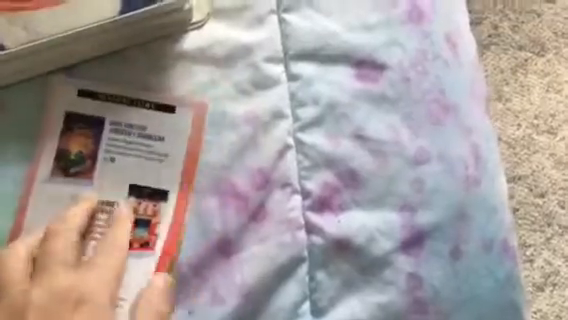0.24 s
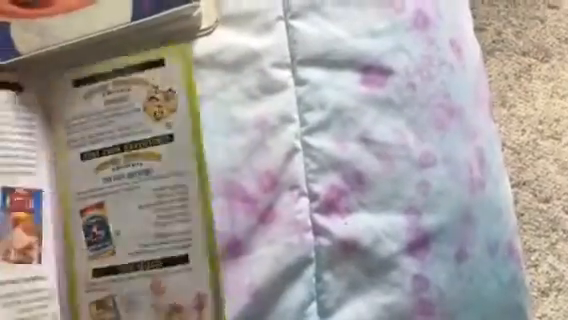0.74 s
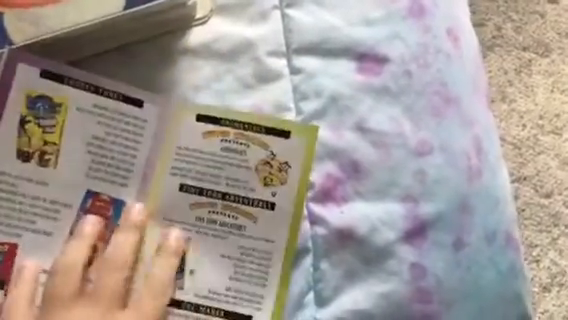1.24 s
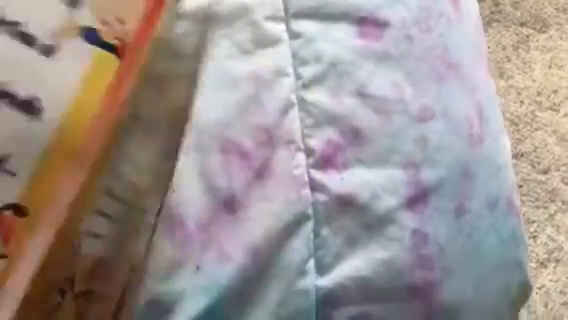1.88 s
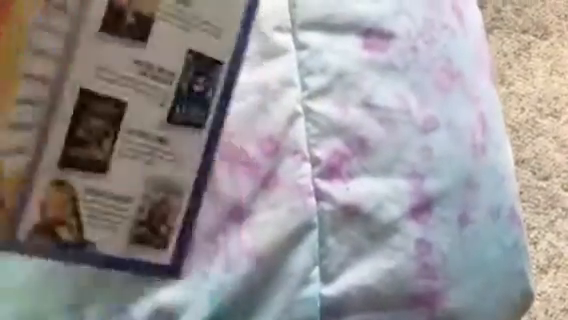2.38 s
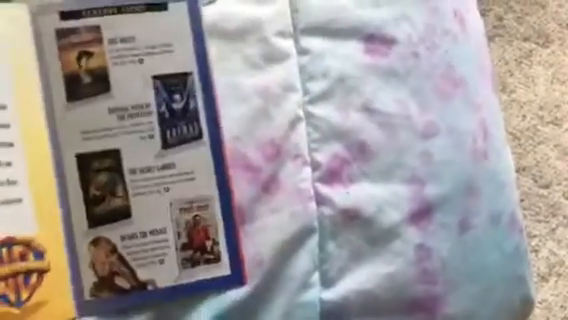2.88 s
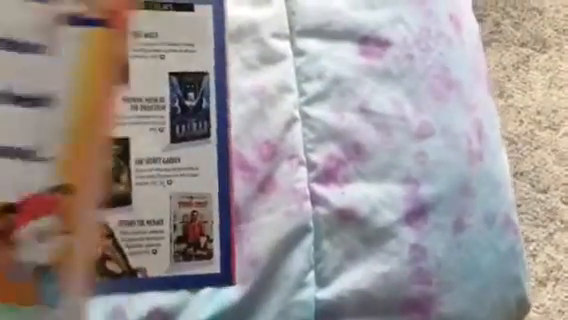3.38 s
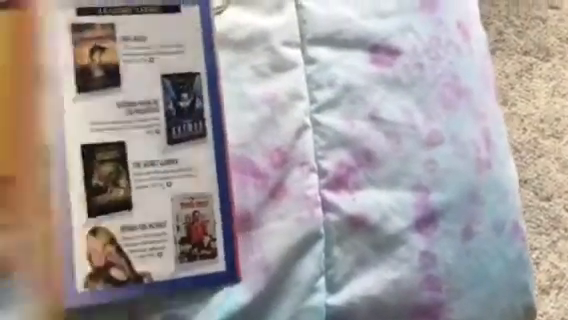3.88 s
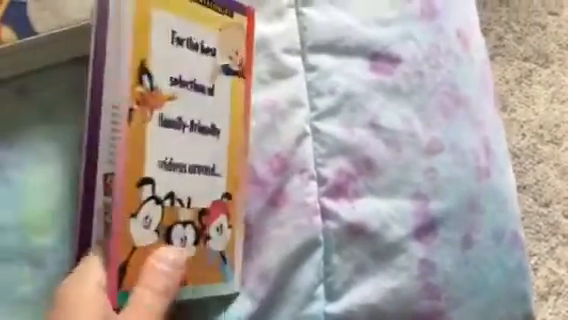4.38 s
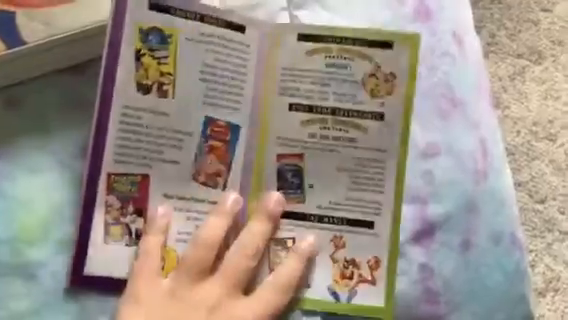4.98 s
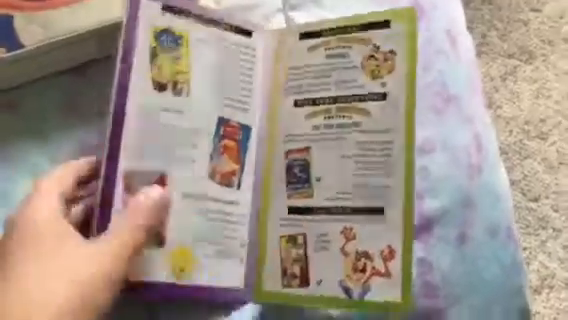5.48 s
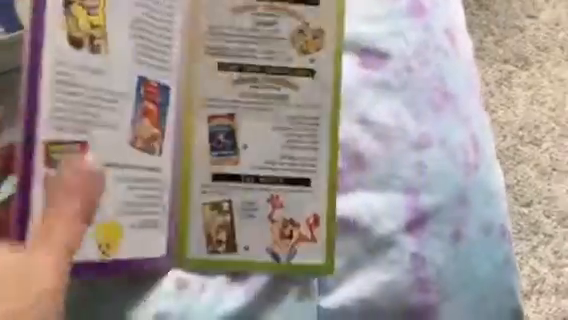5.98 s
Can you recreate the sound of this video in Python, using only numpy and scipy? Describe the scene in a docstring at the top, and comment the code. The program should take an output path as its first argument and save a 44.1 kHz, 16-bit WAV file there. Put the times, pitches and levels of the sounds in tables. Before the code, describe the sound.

A folded glossy leaflet is flipped and handled close up, with papery rustles, sharp crease snaps, one rattling slap and soft quilt thuds.

```python
"""A small quiet room: a folded glossy leaflet is worked in the hands above a quilt, close to a phone.
Creases snap as dispersed clicks with noise flutter; panels pop and flex as bursts of resonant noise.
One panel slaps down with a ringing rattle and a crack; paper slides over paper and skin as hiss and rub.
Edges scuff, the quilt thuds and shifts, and a faint whine comes and goes twice.
Near reflections and a short tail surround the handling, over a low rumble of air."""
import sys
import numpy as np
from scipy import signal
from scipy.fft import rfft, irfft
from scipy.io import wavfile
from scipy.ndimage import uniform_filter1d

SR = 44100
rng = np.random.default_rng(int(sys.argv[2]) if len(sys.argv) > 2 else 0)


def waveform_to_disk(signal):
    """Save audio, clipped to [-1, 1], as 16-bit WAV at the path in sys.argv[1]."""
    frames = np.transpose(np.atleast_2d(signal))
    scaled = np.clip(frames, -1, 1) * 32767
    samples = np.round(scaled).astype(np.int16)
    wavfile.write(sys.argv[1], SR, samples)


N = 275184
TIME = np.arange(N) / SR
SIZE = 8192  # samples in a short event and in a filter
LEAD_S = .012  # room for the onset ahead of a buckle's jump
LANDS_S = 1.0216  # the slapping panel lands flat


def undb(db):
    """Decibels to gain."""
    return 10 ** (np.asarray(db) / 20)


def unit(x):
    """Scale to rms 1."""
    return x / np.sqrt(np.mean(x ** 2))


def colour(x, points, scale=1):
    """Minimum-phase filter whose gain follows (frequency, dB) points, frequencies times scale."""
    f, db = np.transpose(points)
    log_hz = np.log(np.fft.rfftfreq(SIZE, 1 / SR) + 1)
    log_gain = np.interp(log_hz, np.log(f * scale), db) * np.log(10) / 20
    # folding the cepstrum onto positive time makes the filter causal
    cepstrum = irfft(log_gain)
    cepstrum[1:SIZE // 2] *= 2
    cepstrum[SIZE // 2 + 1:] = 0
    impulse_response = irfft(np.exp(rfft(cepstrum)))
    return signal.oaconvolve(x, impulse_response)[:len(x)]


def resonate(x, hz, width_hz):
    """One resonance, gain 1 at its centre."""
    return signal.lfilter(*signal.iirpeak(hz, hz / width_hz, fs=SR), x)


def grains(size, spread_db):
    """Dense tiny slips: noise whose strength jumps every 16 samples; rms 1."""
    strength = np.repeat(rng.standard_normal(size // 16 + 1), 16)[:size]
    return unit(rng.standard_normal(size) * undb(spread_db * strength))


def walk(rate_hz):
    """Smoothed random levels, rate_hz of them a second, spread near 1."""
    k = int(SR / rate_hz)
    return uniform_filter1d(np.repeat(rng.standard_normal(N // k + 1), k), k)[:N]


def add(out, s, x):
    """Mix x in from time s, clipped to the ends of out."""
    i = int(s * SR)
    x, i = x[max(-i, 0):], max(i, 0)
    out[i:i + len(x)] += x[:max(N - i, 0)]


def swell(s, half_s):
    """Start and envelope of a rise and fall peaking at s, about 7 dB down half_s to each side."""
    t = (np.arange(SIZE) - SIZE // 2) / SR
    return s + t[0], signal.windows.tukey(SIZE) / np.cosh(1.44 * t / half_s)


def strokes(rows):
    """Gain of overlapping slides (start s, length s, peak dB): the hand speeds up, then slows to a stop."""
    fastest_share, speed_law = 0.36, 0.58  # fraction of the slide; gain = speed ** speed_law
    power = np.zeros(N)
    for start_s, length_s, db in rows:
        share = np.arange(0, length_s, 1 / SR) / length_s
        phase = np.interp(share, [0, fastest_share, 1], [0, np.pi / 2, np.pi])
        speed = np.abs(np.sin(phase))
        add(power, start_s, (undb(db) * speed ** speed_law) ** 2)
    return np.sqrt(power)


def air():
    """Still air of the house: steady noise weighted to a low rumble."""
    # Each row: frequency in Hz, level in dB.
    air_spectrum = [(15, 1), (25, -3), (59, 7), (141, -8.5), (185, 3), (236, -16), (309, -7.5), (818, -16),
                    (1070, -18), (4870, -32), (6380, -33.5), (14800, -36.5), (16000, -51.5)]
    return unit(colour(rng.standard_normal(N), air_spectrum)) * undb(-65.5)


def whine():
    """A faint thin tone: noise through two narrow resonances in series."""
    # Each row: start in seconds, length in seconds.
    whine_spans = [(3.71, 0.37), (5.726, 0.35)]
    whine_db = -75.5
    tone = resonate(resonate(rng.standard_normal(N), 1334, 110), 1300, 110)
    return unit(tone) * strokes([(*span, whine_db) for span in whine_spans])


def quilt(paper):
    """Cloth shifts beneath the hands, the more the harder the paper is worked."""
    # Each row: frequency in Hz, level in dB.
    cloth_spectrum = [(24, -36), (40, -4.5), (70, -0.5), (108, -5.5), (183, -3), (214, -9), (302, -7.5),
                      (476, -20.5), (642, -23.5), (1200, -24), (1560, -50.5), (2640, -120)]
    cloth_db, effort_law, smoothing_s = -65, .3, 0.12
    effort = uniform_filter1d(np.abs(paper), int(smoothing_s * SR))
    shift = unit(np.abs(effort) ** effort_law)
    rustle = unit(colour(grains(N, 2.4), cloth_spectrum))
    return rustle * shift * undb(cloth_db + 2.6 * walk(25))


def thuds():
    """A hand or panel lands; the padded quilt answers with a damped low swing."""
    # Each row: start in seconds, swing amplitude before decay in dB, pitch in Hz.
    landings = [(.653, -45.5, 133), (1.026, -35.5, 156), (1.343, -38, 156), (1.43, -41, 181),
                (2.021, -43, 64.3), (2.150, -43.5, 197), (2.276, -43.5, 171), (2.403, -38.5, 125),
                (2.711, -34.5, 131.6), (5.547, -46, 130), (6.040, -50, 112)]
    decay_cycles = 1
    out, t = np.zeros(N), np.arange(SIZE) / SR
    for s, db, hz in landings:
        swing = np.sin(2 * np.pi * hz * t) * np.exp(-t * hz / decay_cycles)
        add(out, s, undb(db) * swing)
    return out


def friction():
    """Gains of glossy hiss and dry rub: slides over a light, restless grip."""
    # Each row: start in seconds, length in seconds, peak hiss gain in dB, rub in dB re the hiss.
    slides = [(0.069, 0.12, -67.5, -3), (0.216, .14, -74.5, 0), (0.334, .12, -65.5, 1.5),
              (0.433, .30, -62, -7), (0.686, 0.24, -66, 4), (.87, 0.21, -71.5, 0.5),
              (1.008, .16, -60.5, 0.5), (1.168, 0.18, -63.5, 9.5), (1.288, .235, -58.5, -0.5),
              (1.642, 0.071, -55.5, 0), (1.7, 0.084, -59.5, -4), (1.754, .13, -65.5, -1),
              (1.848, 0.1, -58, 5.5), (2.24, 0.1057, -78, -7), (2.374, .14, -69.5, 0),
              (2.493, 0.12, -71, -1), (2.544, .125, -62.5, -0.5), (2.64, .31, -71.5, -5.5),
              (3.124, .10, -65, -0.5), (3.229, 0.082, -72, -2), (3.289, .105, -63.5, -6.5),
              (3.457, .12, -67.5, -9.5), (3.61, 0.11, -73, -1), (3.946, 0.26, -73, 1.5),
              (4.193, .16, -73, 5), (4.539, .18, -71, -1), (4.69, .21, -68.5, 1.5), (4.946, .14, -70, 3.5),
              (5.315, 0.046, -71, -11), (5.526, .065, -58.5, 0), (5.58, .21, -74, -2), (5.79, 0.19, -84, 0),
              (6.01, .12, -74.5, 3), (6.144, .08, -65.5, -2)]
    grip_hiss_db, grip_rub_db, grip_wander_db = -78, -78, 1.5
    grip = undb(grip_wander_db * walk(4.2))
    hiss = strokes([(s, length_s, db) for s, length_s, db, rub_db in slides])
    rub = strokes([(s, length_s, db + rub_db) for s, length_s, db, rub_db in slides])
    return np.hypot(hiss, undb(grip_hiss_db) * grip), np.hypot(rub, undb(grip_rub_db) * grip)


def scuffs():
    """A catching edge gives a brief gritty burst; random stray ticks scale with the rub gain."""
    # Each row: time of the peak in seconds, rms level there in dB.
    catches = [(.0345, -53), (.044, -52.5), (.658, -48.5), (0.689, -57), (.912, -50), (1.012, -50),
               (1.659, -46.5), (1.681, -46), (1.735, -44.5), (1.82, -51), (2.251, -59.5), (2.432, -61.5),
               (2.723, -54.5), (2.9, -55.5), (3.661, -55.5), (4.411, -54.5), (4.585, -58), (4.862, -59.5),
               (4.965, -62.5), (5.614, -51.5), (5.666, -55), (5.737, -56), (5.775, -56.5)]
    half_s, ticks_per_s = 0.0015, 18
    # Each row: frequency in Hz, level in dB.
    grit = [(300, -14.0), (1200, 5.0), (2200, -4.0), (5000, -6.5), (9000, -6.0), (16000, -14.0)]
    out = np.zeros(N)
    for s, db in catches:
        start_s, envelope = swell(s, half_s)
        add(out, start_s, undb(db) * envelope * unit(colour(grains(SIZE, 3.1), grit)))
    ticks = (rng.random(N) < ticks_per_s / SR) * (2 * rng.random(N) - 1)
    _, rub_gain = friction()
    return out + undb(19.0) * colour(ticks * rub_gain, grit)


def glance(x):
    """The moving panel adds a reflection of wandering delay, so the hiss shifts in colour."""
    lag_samples = SR * 0.00033 * np.exp(0.32 * walk(3.7))
    i = np.arange(N)
    return x + undb(-8.5) * np.interp(i - lag_samples, i, x)


def sliding():
    """Stick and slip: gloss hisses, dry paper rubs lower, a skating fingertip sings faintly."""
    # Each row: frequency in Hz, level in dB.
    hiss_spectrum = [(1470, -36), (2500, -15), (2880, -9.5), (4240, -3), (4910, -6.5), (5780, -3),
                     (9660, -6.5), (10500, -8.5), (14800, -9), (16000, -14.5)]
    # Each row: frequency in Hz, level in dB.
    rub_spectrum = [(300, -15), (600, -4), (1100, -1), (2200, 0.5), (2900, -8), (3700, -7), (5000, -15.5),
                    (7000, -17.5), (10000, -36)]
    # Each row: start in seconds, length in seconds.
    skate_spans = [(3.23, 0.19), (3.442, .14), (3.615, .12), (3.865, 0.056), (3.968, 0.1)]
    skate_db = -68
    gloss, fibres, skin = (grains(N, spread_db) for spread_db in (3.0, 4.5, 3))
    hiss_gain, rub_gain = friction()
    # small offsets offset the mean power that the flicker adds
    hiss = unit(glance(colour(gloss, hiss_spectrum))) * hiss_gain * undb(-0.27 + 2.3 * walk(90))
    rub = unit(colour(fibres, rub_spectrum)) * rub_gain * undb(-0.22 + 2.2 * walk(60))
    finger = unit(resonate(skin, 5856, 780)) * strokes([(*span, skate_db) for span in skate_spans])
    return hiss + rub + finger


def bend(s, hz, half_s):
    """Start and sound of a bending panel: a crowd of tiny buckles coloured by its pitch."""
    # Each row: multiple of the pitch, level in dB.
    bend_spectrum = [(.05, -14), (.25, 1), (.6, -1.5), (1.05, -1), (1.5, -9.5), (2.2, -23), (4, -35.5),
                     (12, -48.5)]
    start_s, envelope = swell(s, half_s)
    crowd = colour(grains(SIZE, 3.9), bend_spectrum, hz)
    return start_s, envelope * unit(crowd + .4 * resonate(crowd, hz * 0.59, hz / 7))


def flexes():
    """Panels bend slowly, low pitches lasting longer; faint bends fall at random between."""
    # Each row: time of the peak in seconds, rms level there in dB, pitch in Hz.
    clear_bends = [(.735, -57, 840), (.779, -46, 1312), (.796, -53, 950), (.879, -53, 1300),
                   (0.916, -54.5, 758), (1.478, -52.5, 1198), (2.148, -53.5, 700), (2.272, -55.5, 1090),
                   (2.352, -52, 828), (2.412, -57, 545), (2.450, -51.5, 890), (2.590, -58.5, 1130),
                   (3.138, -61.5, 657), (3.245, -53, 639.3), (3.678, -51.5, 698), (3.906, -59.5, 348.7),
                   (4.645, -51, 1392), (5.560, -51, 910), (5.720, -52, 1270)]
    half_cycles = 13.8
    stray_per_s, stray_mean_db, stray_centre_hz = 2, -64.5, 600
    stray = []
    for when, strength, pitch in rng.random((int(stray_per_s * N / SR), 3)):
        db = stray_mean_db + 6 * (strength - .5)
        stray.append((when * N / SR, db, stray_centre_hz * 2 ** (2 * pitch - 1)))
    out = np.zeros(N)
    for s, db, hz in [*clear_bends, *stray]:
        start_s, sound = bend(s, hz, half_cycles / hz)
        add(out, start_s, undb(db) * sound)
    return out


def disperse(x, hz, cycles):
    """Bending waves travel faster at high pitch, so a click becomes a tiny falling chirp."""
    f = np.fft.rfftfreq(len(x), 1 / SR)
    return irfft(rfft(x) * np.exp(-2j * np.pi * cycles * np.sqrt(f / hz)), len(x))


def buckle(hz, flutter_db, decay_s, tick_db, ring=None):
    """The sheet jumps (peak 1) with an edge tick, then its bending waves flutter away."""
    # Each row: multiple of the pitch, level in dB.
    buckle_spectrum = [(.02, -33.5), (.1, -21), (.3, -6.5), (.6, -3.5), (1.1, -2.5), (1.45, -10), (2, -22),
                       (4, -32.5), (12, -53)]
    t = np.arange(SIZE) / SR - LEAD_S

    def burst(rise_s, fall_s):
        return np.exp(np.minimum(t / rise_s, -t / fall_s))

    click = signal.unit_impulse(SIZE, int(LEAD_S * SR))
    jump = disperse(colour(click, buckle_spectrum, hz), hz, cycles=2.6)
    if ring:  # a wide panel swings (ring = Q) and flutters above its own pitch
        jump = resonate(jump, hz, hz / ring) + undb(-13) * jump
        hz = hz * 1.95
    flutter = unit(colour(grains(SIZE, 0.76), buckle_spectrum, hz)) * burst(0.0023, decay_s)
    tick = resonate(rng.standard_normal(SIZE) * burst(0.00077, 0.0012), 4700, 5400)
    jump = jump / np.abs(jump).max()
    tick = tick / np.abs(tick).max()
    return jump + undb(flutter_db - 0.5) * flutter + undb(tick_db - 3) * tick


def snaps():
    """Creases click dead, then relax at a lower pitch; a whole panel popping over sounds hollow."""
    # Each row: time in seconds, jump peak in dB, pitch in Hz, flutter in dB re the peak (before a 0.5 dB cut).
    creases = [(0.658, -45, 3000, -8), (.690, -47, 805, -5), (.863, -41.5, 1980, -6),
               (.914, -36, 684, -14.5), (1.0556, -29, 815, -12.5), (1.3419, -27, 3170, -19.5),
               (1.4275, -21.5, 2000, -13.5), (1.461, -38, 1800, -11), (1.547, -41.5, 2020, -19.5),
               (1.571, -41, 2050, -19.5), (1.594, -43, 1990, -20), (1.663, -33, 2600, -13.5),
               (1.6814, -31.5, 2060, -14.5), (1.744, -39, 1510, -6), (2.021, -35.5, 1358, -7.5),
               (2.250, -50.5, 1600, -9), (2.724, -36.5, 797, -19), (2.803, -46, 708, -14.5),
               (3.362, -40.5, 1895, -5), (4.582, -43.5, 2100, -16.5), (4.624, -43, 1750, -9.5),
               (5.0202, -30.5, 1810, -19.5), (5.714, -44.5, 1470, -10), (6.0552, -39, 1307, -6)]
    # Each row: time in seconds, jump peak in dB, edge tick in dB re the peak (before a 3 dB cut).
    panel_pops = [(2.708, -21.5, -14), (5.9357, -22.5, -20)]
    flutter_cycles, crease_tick_db = 14, -23  # tick before the 3 dB cut
    settle_s, settle_ratio, settle_db = .012, .62, -5  # delay, pitch ratio, level re the table's flutter
    pop_hz, pop_flutter_db, pop_decay_s = 582, -20, .015  # flutter before the 0.5 dB cut
    out = np.zeros(N)
    for s, db, hz, flutter_db in creases:
        add(out, s - LEAD_S, undb(db) * buckle(hz, flutter_db, flutter_cycles / hz, crease_tick_db))
        start_s, sound = bend(s + settle_s, hz * settle_ratio, half_s=.008)
        add(out, start_s, undb(db + flutter_db + settle_db) * sound)
    for s, db, tick_db in panel_pops:
        add(out, s - LEAD_S, undb(db) * buckle(pop_hz, pop_flutter_db, pop_decay_s, tick_db, ring=2.2))
    return out


def slap_force():
    """Contact builds from first touch to landing, sags in the rattle, then lets go to a weak tail."""
    touch_s, rise_s, force_db = 1.011, .0035, -24
    rattle_s, sag_db_per_s, release_s = .027, 231, 0.0017
    tail_db, tail_s = -14.5, 0.037
    t = TIME - LANDS_S
    attack = (1 - np.exp(-np.maximum(TIME - touch_s, 0) / rise_s)) ** 2
    hold = undb(-sag_db_per_s * np.abs(t))
    release = np.exp(-np.maximum(t - rattle_s, 0) / release_s)
    tail = undb(tail_db) * np.exp(-np.abs(t) / tail_s)
    return undb(force_db) * attack * np.hypot(hold * release, tail)


def slap():
    """Contact along the panel's edge is a dense rattle that rings the sheet and peaks in a crack."""
    # Each row: frequency in Hz, level in dB.
    rattle_spectrum = [(88, -89.5), (150, -7.5), (391, -4.5), (624, -1), (805, -11.5), (1480, 3), (1760, 1),
                       (1900, 10.5), (2180, -7), (2360, -3), (2700, -11.5), (4490, -14), (7920, -21.5),
                       (9630, -78.5), (16000, -50)]
    # Each row: frequency in Hz, level in dB.
    crack_spectrum = [(500, -29), (1400, -8.5), (2100, 7), (2800, -11), (3400, 1.5), (4200, 0),
                      (5000, -10.5), (8000, -19.5), (16000, -44.5)]
    # Each row: resonance in Hz, width in Hz, level in dB.
    panel_modes = [(1080, 30, -4.5), (1523, 21, -8), (1905, 24, -4), (2194, 61, 5.5), (2313, 52, -5.5)]

    def ring(x):
        return sum(undb(db) * resonate(x, hz, width_hz) for hz, width_hz, db in panel_modes)

    contact = grains(N // 4, 1.0)
    size = len(contact)
    blows = contact * slap_force()[:size]
    # scaled by the steady contact, so the force sets the level
    rattle = colour(blows, rattle_spectrum) / np.std(colour(contact, rattle_spectrum))
    ringing = ring(blows) / np.std(ring(contact))
    landing = np.exp(-np.abs(TIME[:size] - LANDS_S) / .0013)
    crack = colour(rng.standard_normal(size) * landing, crack_spectrum)
    crack = crack / np.abs(crack).max()
    sound = undb(-3.5) * rattle + undb(-7.0) * ringing + undb(-8.0) * crack
    return np.pad(sound, (0, N - size))


def room(x):
    """Near reflections from hands, panels and furniture, and the short tail of a furnished room."""
    # Each row: delay in seconds, level in dB.
    reflections = [(.0009, -30), (.0029, -21.5), (.0062, -21.5)]
    t60_s, tail_start_s, tail_db = 0.43, .006, -17.0
    t = np.arange(SR // 2) / SR
    tail = rng.standard_normal(len(t)) * undb(-60 * t / t60_s) * (t > tail_start_s)
    tail = colour(tail, [(100, 1.5), (1000, -3), (4000, -6.5), (9000, 0.5), (16000, -1.5)])
    tail = tail / np.sqrt(np.sum(tail ** 2))
    out = x + undb(tail_db) * signal.fftconvolve(x, tail)[:N]
    for delay_s, db in reflections:
        add(out, delay_s, undb(db) * x)
    return out


def scene():
    """Leaflet and quilt in the room, plus the whine and the air without room sound."""
    background = air()
    paper = snaps() + scuffs() + slap() + sliding() + flexes()
    return (room(paper + thuds() + quilt(paper)) + whine() + background)[None]


def record(dry):
    """The phone cuts the deepest bass and the top."""
    bass_cut = signal.butter(4, 34, "high", fs=SR, output="sos")
    top_cut = signal.ellip(10, .2, 70, 16100, fs=SR, output="sos")
    return signal.sosfilt(top_cut, signal.sosfilt(bass_cut, dry))


dry = scene()
out = record(dry)
waveform_to_disk(out)
```